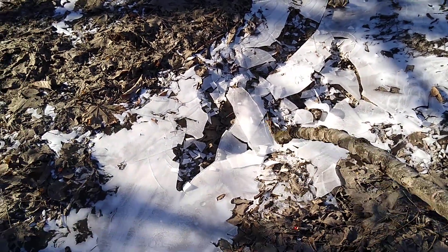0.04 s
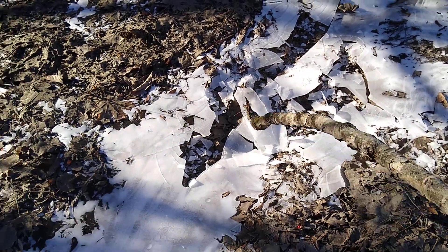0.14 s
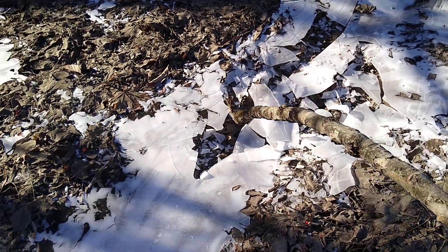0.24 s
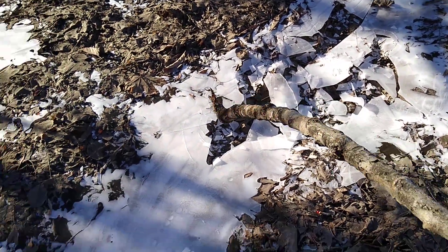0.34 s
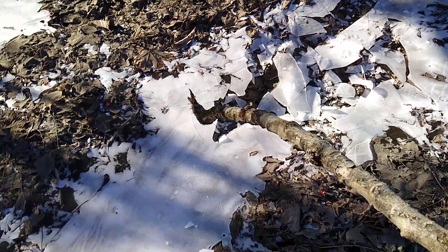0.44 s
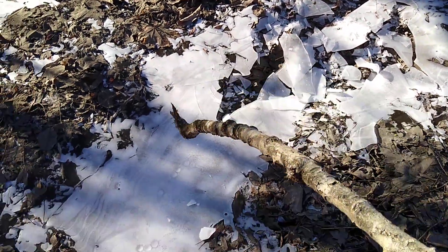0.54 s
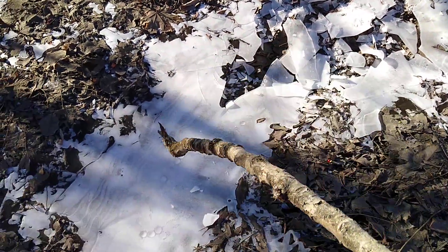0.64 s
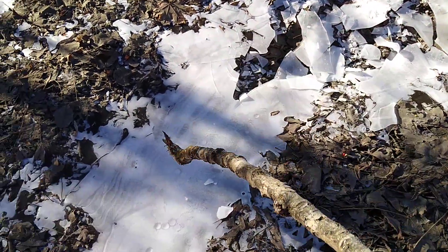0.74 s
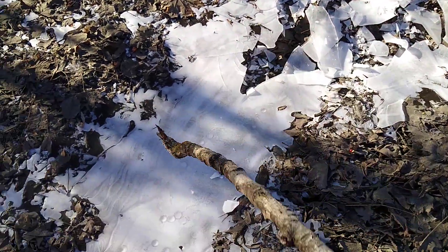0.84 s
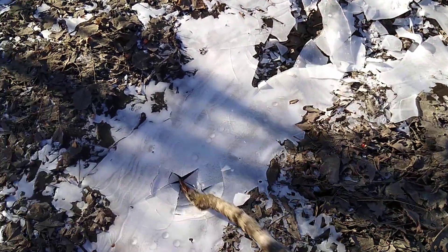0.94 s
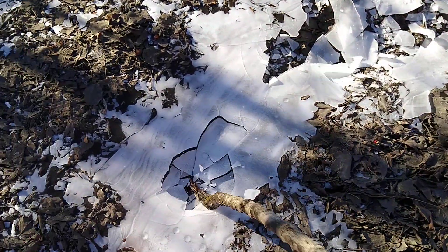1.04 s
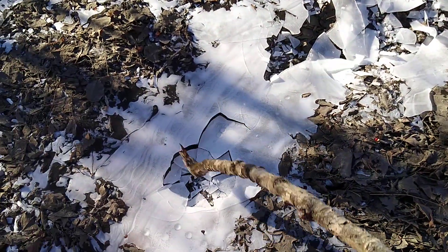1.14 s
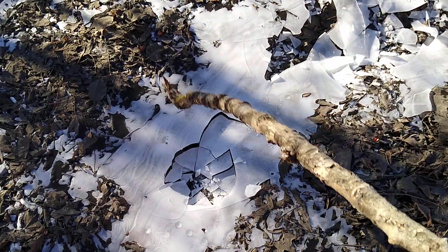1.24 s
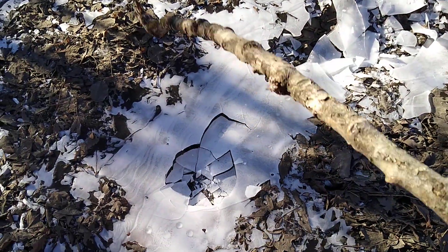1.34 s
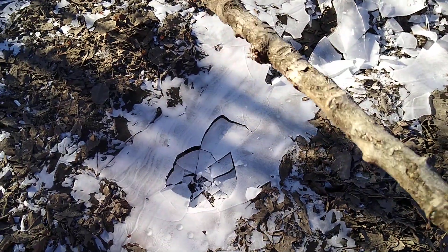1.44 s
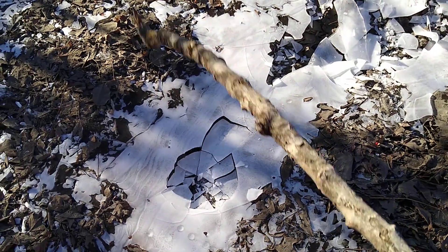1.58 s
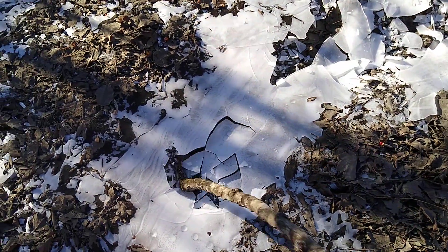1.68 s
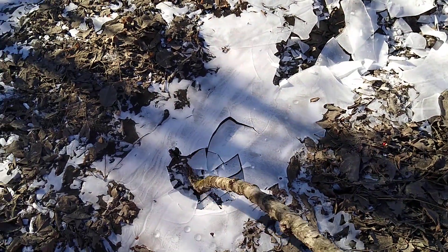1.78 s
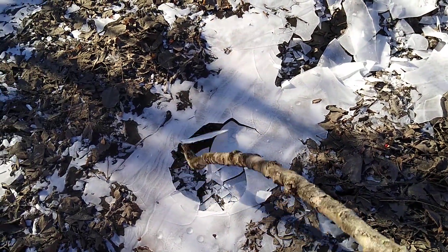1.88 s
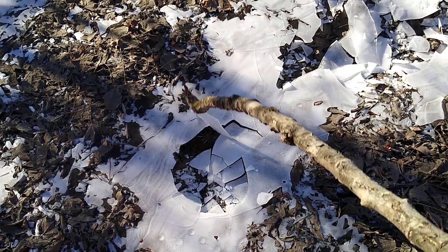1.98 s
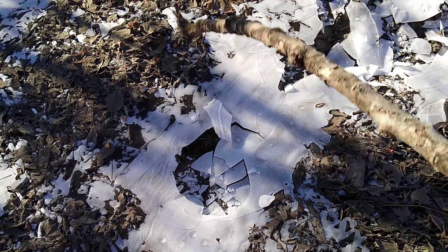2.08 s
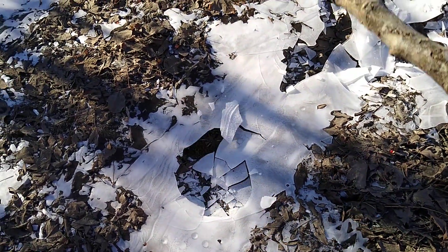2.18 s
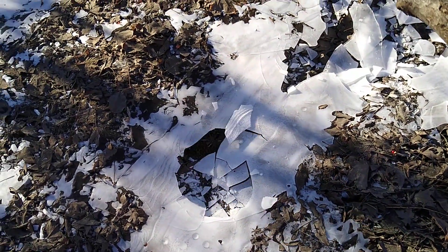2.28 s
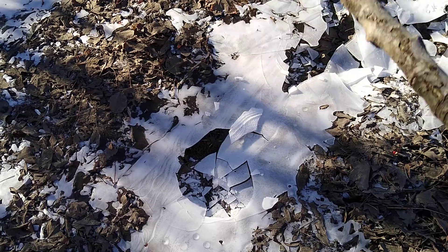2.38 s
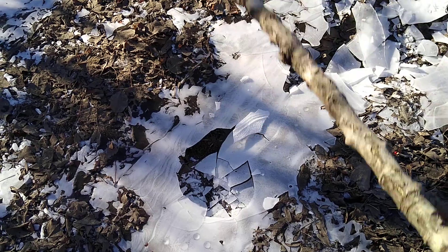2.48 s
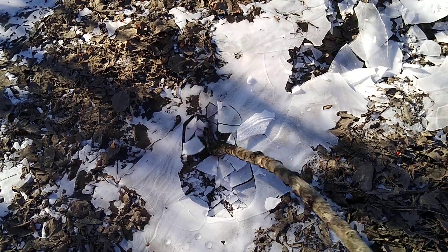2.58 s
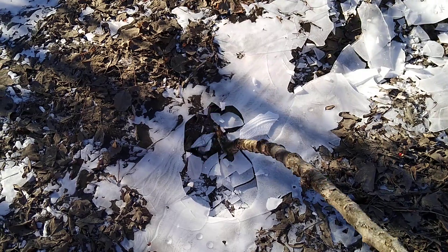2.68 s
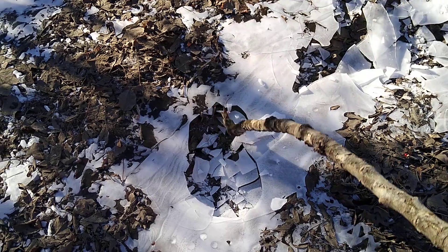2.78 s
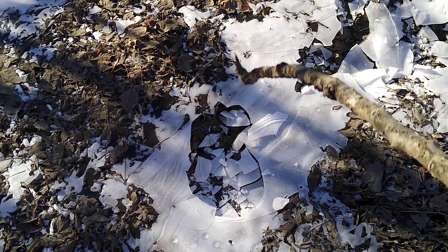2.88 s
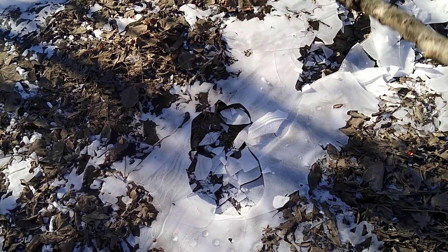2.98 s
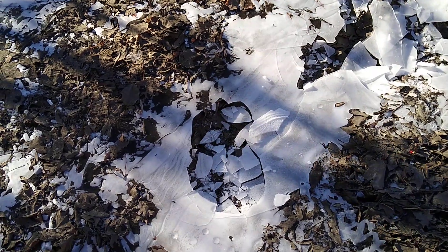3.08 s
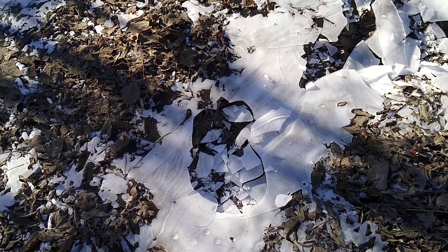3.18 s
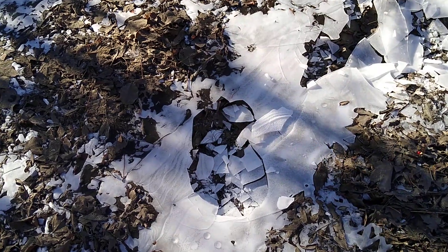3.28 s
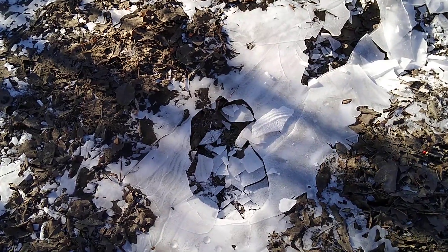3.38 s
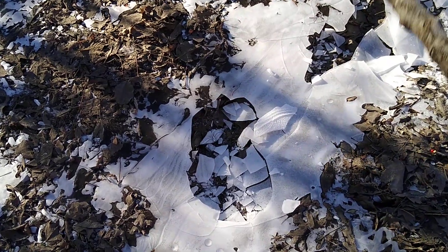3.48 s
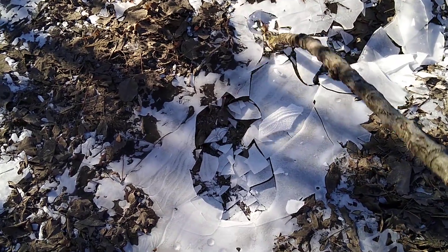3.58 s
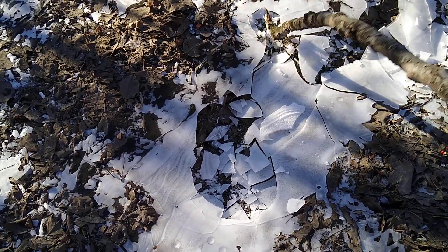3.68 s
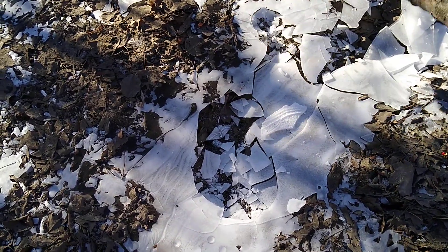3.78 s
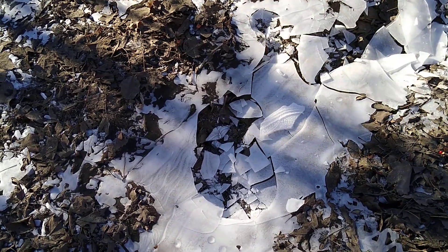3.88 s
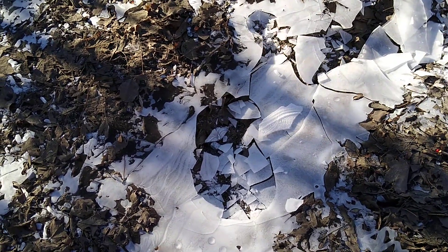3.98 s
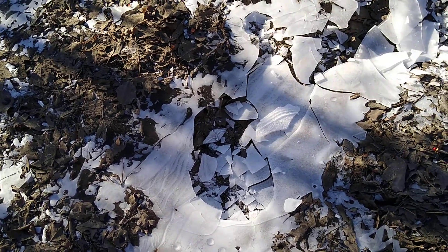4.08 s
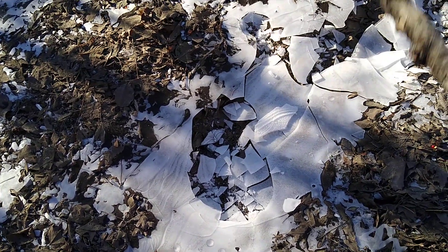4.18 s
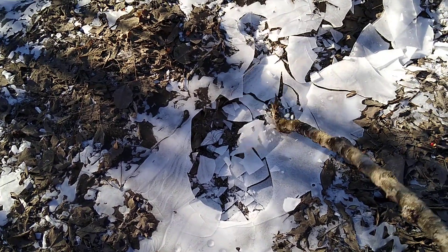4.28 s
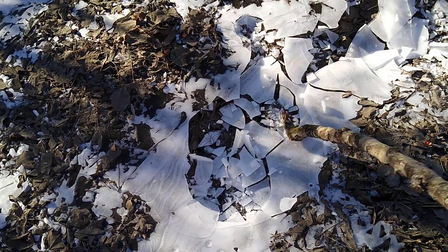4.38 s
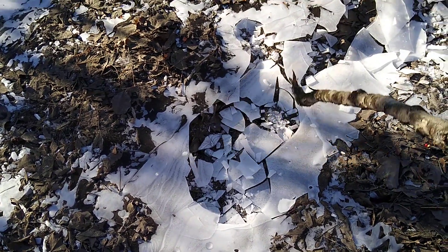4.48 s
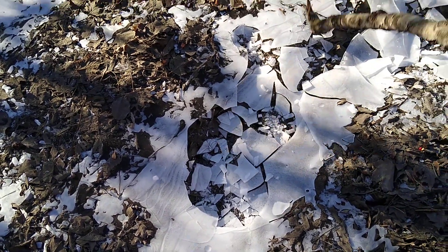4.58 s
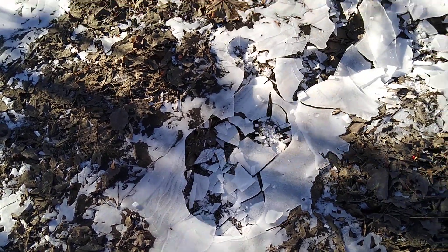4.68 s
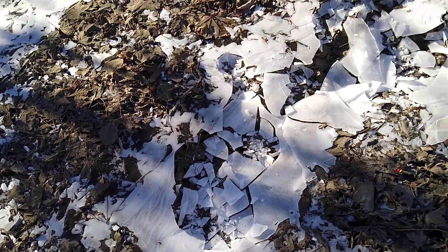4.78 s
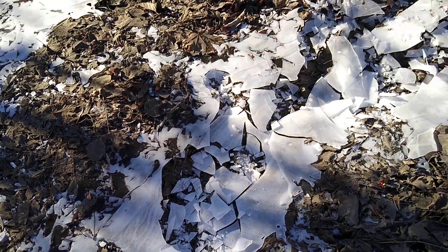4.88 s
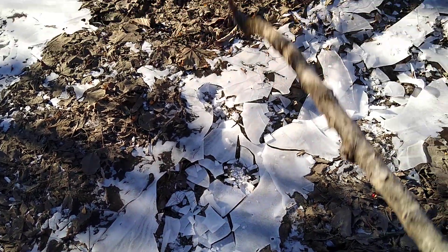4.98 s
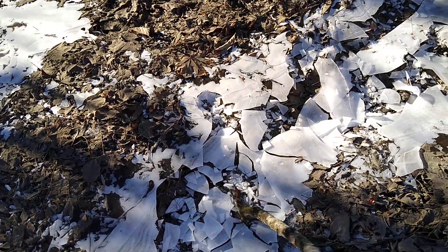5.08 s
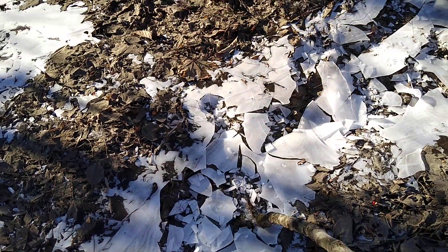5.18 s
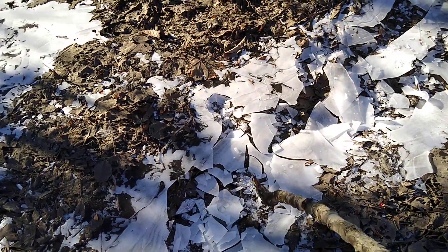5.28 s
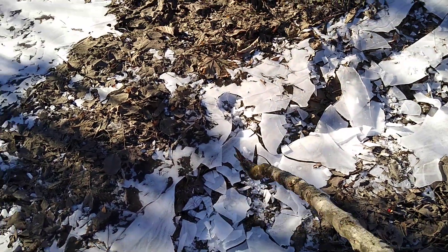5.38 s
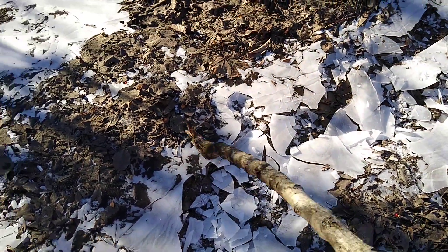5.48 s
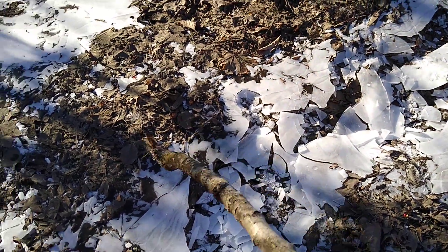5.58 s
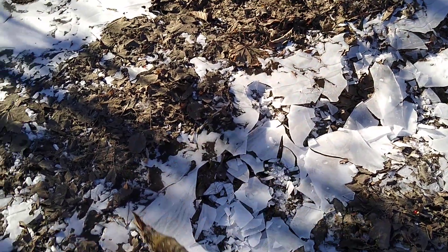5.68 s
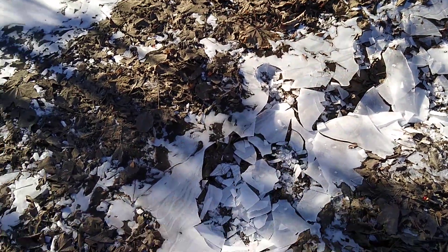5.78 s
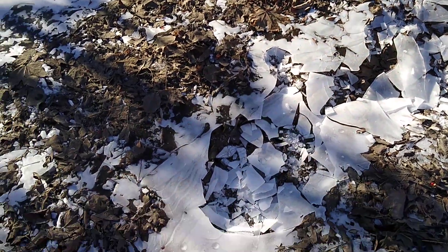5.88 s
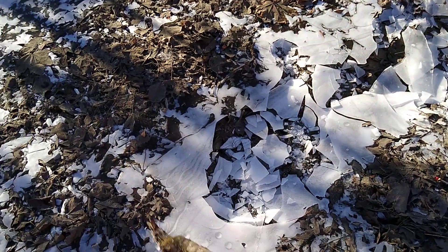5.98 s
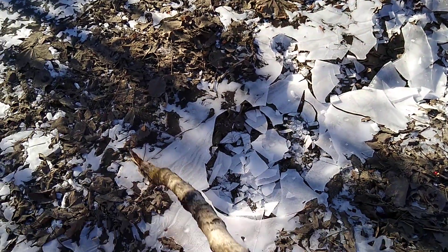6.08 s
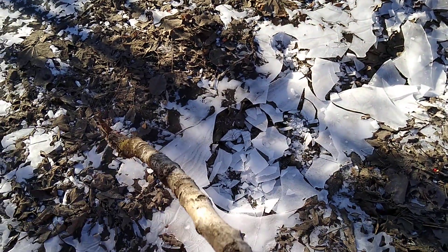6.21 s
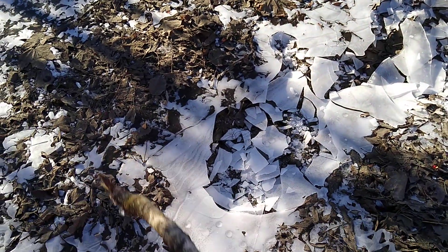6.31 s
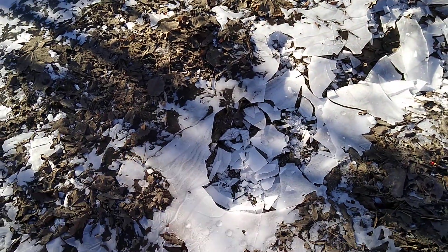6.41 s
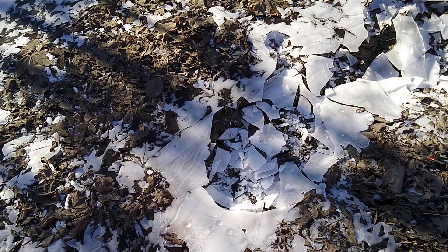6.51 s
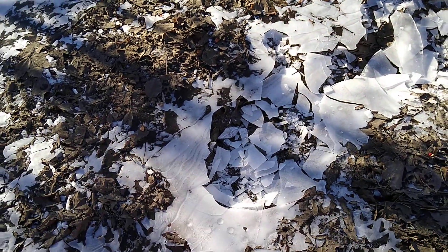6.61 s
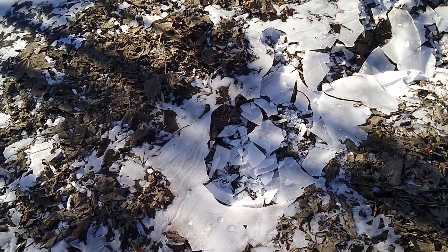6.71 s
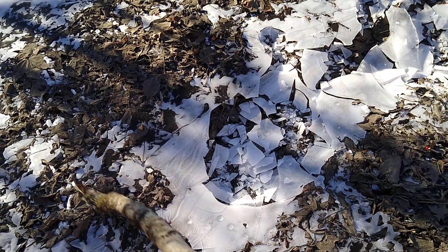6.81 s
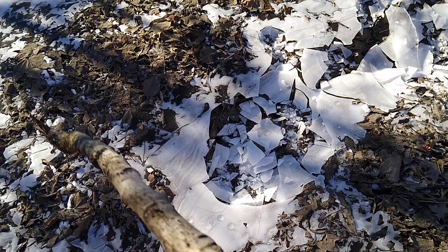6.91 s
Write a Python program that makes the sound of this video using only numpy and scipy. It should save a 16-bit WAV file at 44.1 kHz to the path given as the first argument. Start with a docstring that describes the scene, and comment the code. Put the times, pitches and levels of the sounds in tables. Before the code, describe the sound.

A stick breaks thin, hollow ice lying over dry leaves, heard close and slightly left in open woods. Faint ticking taps come at 0 to 0.3 seconds, then a light crack with small crackles near 0.6 to 0.7. Hard jabs snap through at about 1.06 and 1.8, each sharp and glassy with a hollow low puff, followed by clattering, clinking fragments. Small cracks follow near 2.0; at 2.2 a loose plate is knocked free, rings brightly and skates with a thin scrape. Further crunching blows land at 2.7, 3.65, 4.4, 5.2, 5.87 and 6.55, with a sharp tap at 4.75; splinters tinkle and settle between them. A weak dull echo trails the ice. Beneath, a soft low rumble gradually sinks, with faint hiss and a narrow airy rushing tone coming and going until about 7 seconds.

```python
"""A stick taps thin shell ice that lies hollow over dry leaves, outdoors, over a low rumble and faint hiss.
It cracks the sheet lightly, then jabs through it again and again in quick fractures with low puffs of air.
After each blow, noise grains and damped modes make the pieces clatter, clink and settle into the leaves.
At 2.2 s a loose plate is knocked free: clicks set its modes ringing, then coloured grains make it skate.
The jabs go on to the end; a weak echo tail follows the ice, and a narrow rushing tone swells and fades."""
import sys
import numpy as np
from scipy import signal
from scipy.fft import rfft, irfft
from scipy.io import wavfile
from scipy.ndimage import uniform_filter1d

SR = 44100
rng = np.random.default_rng(int(sys.argv[2]) if len(sys.argv) > 2 else 0)


def dump(signal):
    """Clip the signal to [-1, 1] and save it as 16-bit WAV at the path in sys.argv[1]."""
    limited = np.clip(np.atleast_2d(signal).T, -1, 1)
    pcm = np.round(limited * 32767).astype(np.int16)
    wavfile.write(sys.argv[1], SR, pcm)


N = 306450


def from_db(db):
    """Decibels to amplitude."""
    return 10 ** (np.asarray(db) / 20)


def rms_one(x):
    """Scale to an RMS of one."""
    return x / np.sqrt(np.mean(x ** 2) + 1e-20)


def in_time(rows):
    """Each column of a curve, sample by sample."""
    s, *columns = np.transpose(rows)
    return [np.interp(np.arange(N) / SR, s, column) for column in columns]


def add(out, s, sound):
    """Mix a sound in at its time."""
    at = int(s * SR)
    out[..., at:at + sound.shape[-1]] += sound[..., :N - at]


def band(x, low_hz, high_hz, order=3):
    """Causal band-pass."""
    sos = signal.butter(order, [low_hz, min(high_hz, .45 * SR)], "band", fs=SR, output="sos")
    return signal.sosfilt(sos, x + 1e-18)


def colour(x, points, share=1):
    """Minimum-phase filter through (Hz, dB) points scaled by share, so nothing sounds early."""
    hz, db = np.transpose(points)
    grid = np.maximum(np.fft.rfftfreq(4096, 1 / SR), 1)
    gain_db = share * np.interp(np.log(grid), np.log(hz), db)
    # folding the cepstrum gives the minimum phase
    cepstrum = irfft(np.log(from_db(gain_db)))
    half = len(cepstrum) // 2
    cepstrum[1:half] *= 2
    cepstrum[half + 1:] = 0
    pulse = irfft(np.exp(rfft(cepstrum)))
    pulse = pulse.reshape((1,) * (x.ndim - 1) + (-1,))
    return signal.oaconvolve(x, pulse)[..., :x.shape[-1]]


def ring(clicks, hz, t60):
    """A two-pole resonator: each unit click starts a damped sine of height 1."""
    radius = from_db(-60 / (max(t60, 1e-4) * SR))
    w = 2 * np.pi * hz / SR
    return signal.lfilter([0, np.sin(w)], [1, -2 * radius * np.cos(w), radius ** 2], clicks + 1e-18)


def damped_tones(rows):
    """Single sines that die away exponentially."""
    out, t = np.zeros(N), np.arange(SR // 3) / SR
    for s, hz, db, t60 in rows:
        add(out, s, from_db(db - 60 * t / t60) * np.sin(2 * np.pi * hz * t))
    return out


def grains(size, per_s, spread_db):
    """Random clicks of either sign, their sizes spread exponentially in dB."""
    out = np.zeros(size)
    at = np.flatnonzero(rng.random(size) < per_s / SR)
    sizes = from_db(spread_db * np.minimum(rng.exponential(1, len(at)), 4))
    out[at] = sizes * rng.choice([-1, 1], len(at))
    return out


def widen(pair, wide_hz=3500):
    """Mid and side to left and right: the bass is shared, the treble differs."""
    side = signal.lfilter(*signal.butter(1, wide_hz, "high", fs=SR), pair[1])
    return np.array([pair[0] + side, pair[0] - side])


# The sheet breaks under the stick. Each row: start in seconds, time the fracture runs in seconds,
# relative level in dB, tilt in dB per octave, hollow knock in dB.
BREAKS = [(0.5973, 0.007, -43.5, -3.5, -9.5), (0.6838, 0.008, -30.5, -0.5, -1.5),
          (0.7032, 0.015, -44, -1.5, -6.5), (1.0615, 0.036, -23, -2.1, 2.5), (1.0745, 0.016, -28, 2.5, -10),
          (1.1392, 0.12, -37.5, 1.2, -2), (1.789, 0.016, -22.5, -0.44, 4.5),
          (1.798, 0.011, -25, -0.7, -7.5), (1.9536, 0.023, -47.5, 2, -2.5), (1.971, 0.06, -42.5, -3, 6.5),
          (2.0103, 0.049, -42.5, 1.9, -4.5), (2.109, 0.031, -52.5, -3.7, 8),
          (2.1948, 0.024, -42.5, 2.5, 2.5), (2.203, 0.012, -34.5, 7, 2.5), (2.2049, 0.0096, -29.5, 1, 5),
          (2.294, .012, -48, -3.5, -0.5), (2.311, .015, -36, 1.3, 1.5), (2.6866, .019, -25, 1.5, 6.5),
          (2.698, 0.009, -21, -.2, -12), (2.736, .018, -42, 1, -16), (3.65, 0.0063, -25, -1.3, 4.5),
          (3.655, 0.0095, -24.5, 1.7, 0), (3.6743, .016, -39, 2.5, -2.5), (3.726, 0.024, -39, 4.5, -7),
          (4.3757, 0.00099, -26.5, 1.9, -0.5), (4.3767, 0.033, -24.5, -0.5, -8),
          (4.521, 0.021, -37, 0.1, 8), (4.5827, .0085, -49, 6, 15.5), (4.6152, 0.02, -48, 3.8, 6.5),
          (5.192, .0084, -24.5, 1.3, -5.5), (5.1937, 0.029, -28.5, -1.5, -10),
          (5.3727, 0.025, -52.5, 3.5, 10.5), (5.865, 0.016, -24.5, -0.1, 2), (5.868, 0.016, -24, 0.2, 2.5),
          (5.8713, 0.024, -34, -3.5, 5.5), (5.9604, 0.029, -32.5, -2, 2), (6.5426, 0.024, -25.5, -0.2, 2.5),
          (6.553, 0.015, -26.5, 1, -2)]
# The stick taps ice that holds. Each row: start in seconds, relative level in dB, tilt in dB per octave.
TAPS = [(0.045, -40, 1.5), (0.092, -43, 4), (0.113, -38.5, 3.5), (0.2803, -37.5, 0.5), (0.3, -38, -.5),
        (0.7109, -39, 1.5), (0.7531, -45, 1.5), (0.8233, -56.5, 0), (1.043, -54.5, -2), (2.166, -54.5, 0),
        (3.0092, -57.5, -0.5), (3.0657, -50.5, -0.5), (4.6765, -46.5, 1.5), (4.7317, -44, 1),
        (4.754, -25, -2)]
# Chips snap off the broken edge. Each row: start in seconds, relative level in dB, tilt in dB per octave.
CHIPS = [(1.2347, -44, -1.5), (1.2628, -55, 0), (1.282, -49.5, 2), (1.3066, -55, 4), (1.34, -43, 1),
         (1.644, -60.5, -2), (1.6947, -54.5, 2.5), (1.8881, -47.5, 2), (2.5221, -53.5, 2),
         (2.8115, -50.5, 4.5), (2.828, -49, 1), (2.842, -50.5, 4.5), (2.903, -47, 3.5), (2.9612, -40, -0.5),
         (3.0324, -51, -5.5), (3.1352, -51, -3), (3.1793, -59.5, 1.5), (3.343, -59, -2.5),
         (3.5007, -61, -0.5), (3.5459, -59, -2.5), (3.7955, -45, 3.5), (3.8381, -51.5, 6.5),
         (3.8833, -55.5, 2.5), (3.906, -56, 4), (4.6554, -51, -0.5), (4.8709, -53, -3),
         (4.9276, -63.5, -4.5), (5.315, -42.5, -1), (5.3446, -52, 3), (5.4632, -52.5, -2.5),
         (5.7943, -76, 4), (6.02, -58.5, 3.5), (6.065, -55, 6), (6.1945, -71, 1), (6.645, -49, 0.5),
         (6.7036, -61.5, 7.5), (6.7449, -60, 6.5), (6.787, -61, 4.5), (6.8347, -58.5, 0.5), (6.872, -63, 1)]
TAP_RUN_S, CHIP_RUN_S = 0.0034, 0.019   # time the fracture runs
# Colour of each kind of snap. Each entry: relative level in dB of one crack band, lowest first.
BREAK_BANDS_DB = [-8.5, -2.5, -0.5, 0.8, -3.5]
TAP_BANDS_DB = [-12.5, 0.5, -2, -11.5, -10]
CHIP_BANDS_DB = [-16, -17.5, -7, -0.5, 0.35]
# The hollow answers in the low middle. Each entry: share of the knock's dB in one crack band.
KNOCK_SHARES = [0, 1, 1, 0, 0]


def cracks():
    """The sheet breaks over its hollow, the stick taps, chips come off: all are short fractures."""
    s, run_s, db, tilt, knock_db = np.transpose(BREAKS)
    bands_db = tilted(BREAK_BANDS_DB, db, tilt) + np.outer(knock_db, KNOCK_SHARES)
    out = place_fractures(s, run_s, bands_db)
    for rows, run_s, kind_db in ((TAPS, TAP_RUN_S, TAP_BANDS_DB), (CHIPS, CHIP_RUN_S, CHIP_BANDS_DB)):
        s, db, tilt = np.transpose(rows)
        out = out + place_fractures(s, run_s, tilted(kind_db, db, tilt))
    return widen(out)


# Edges of the crack bands. Each entry: frequency in Hz.
CRACK_EDGES_HZ = [100, 350, 900, 2000, 5000, 16000]
TILT_PIVOT_HZ = 2000


def tilted(bands_db, db, tilt):
    """Band levels of each snap, leaning to bass or treble about the pivot."""
    octaves = np.log2(np.array(CRACK_EDGES_HZ) / TILT_PIVOT_HZ)
    centres = (octaves[1:] + octaves[:-1]) / 2
    return np.array(bands_db) + db[:, None] + np.outer(tilt, centres)


# Colour of breaking ice before its bands are levelled. Each row: frequency in Hz, relative level in dB.
ICE = [(59, -26.5), (100, -4), (206, 6.5), (358, -1.5), (513, 0), (736, -5), (1080, 3), (1910, -6),
       (2320, -4), (4020, -7), (6150, -21), (7940, -22.5), (10900, -13), (15000, -17), (16000, -25.5)]


def place_fractures(s, run_s, bands_db, lead_s=0.0013, lead_db=-19.5):
    """One fracture per time, split into bands that each get their own energy."""
    out, sounds = np.zeros((2, N)), 0
    raw = colour(np.array([fracture(run) for run in run_s + np.zeros(len(s))]), ICE)
    for k, (low, high) in enumerate(zip(CRACK_EDGES_HZ, CRACK_EDGES_HZ[1:])):
        part = band(raw, low, high)
        # 0 dB is an RMS of one if the energy is spread over 10 ms
        part *= np.sqrt(SR / 100) / np.linalg.norm(part, axis=-1, keepdims=True)
        sounds = sounds + part * from_db(bands_db[:, k])[:, None, None]
    for start, sound in zip(s, sounds):
        add(out, start - lead_s, from_db(lead_db) * sound)   # a faint copy of each snap comes just before it
        add(out, start, sound)
    return out


def fracture(run_s, first=3.2, sheet_db=-17.0, sheet_t60=0.13, shard_db=-11.0, shard_t60=0.025, count=7):
    """A first snap, a run of smaller ones as the crack travels, then the ring of shard and sheet."""
    t = np.arange(SR // 9) / SR
    snaps = grains(len(t), 3500, 2.2) * from_db(-26 * t / max(run_s, 1e-4))
    snaps[0] = first * rng.choice([-1, 1])
    snaps /= np.linalg.norm(snaps)
    pair = np.array([snaps, snaps * rng.choice([-1, 1], len(t))])
    tail = rng.standard_normal(pair.shape) * from_db(-60 * t / sheet_t60)
    # every shard has a few modes of its own
    pitches = rng.uniform(1200, 14000, (count, 1))
    modes = np.sin(2 * np.pi * pitches * t) * from_db(-60 * t / shard_t60)
    shard = rng.standard_normal((2, count)) @ modes
    shard *= from_db(shard_db) / np.linalg.norm(shard[0])
    # a longer fracture shakes more of the sheet
    tail *= from_db(sheet_db) * np.sqrt(run_s / 0.021) / np.linalg.norm(tail[0])
    return pair + shard + tail


# Air pumped from the hollow as the sheet sags. Each row: start in seconds, pitch in Hz,
# starting level in dB before the band-pass, time to fall 60 dB in seconds.
THUMPS = [(1.066, 140, -22.5, 0.096), (1.791, 202, -32.5, .05), (2.699, 160, -21, 0.07),
          (2.72, 134.5, -31, 0.12), (3.655, 128.2, -32.5, 0.12), (4.38, 52.4, -21, 0.1),
          (4.383, 94.8, -33, 0.1), (5.194, 211, -26.5, 0.11), (5.21, 93, -32, 0.11), (5.279, 190, -37, .06),
          (5.867, 192, -29, 0.063), (5.965, 156, -28, 0.091), (6.547, 340.4, -22.5, 0.057)]


def puffs(lowest_hz=36, gust_hz=80):
    """Air pumped from under the sheet: damped low tones, the deepest part stronger on the left."""
    air = band(damped_tones(THUMPS), lowest_hz, 2000)
    gust = signal.sosfiltfilt(signal.butter(2, gust_hz, fs=SR, output="sos"), air)
    return np.array([air + 0.52 * gust, air - 0.68 * gust])


def debris():
    """Plates clatter, splinters tinkle, crumbs and dry leaves crackle: three sizes of grain."""
    clatter = settling(burst_db=-2.0, tail_db=-4.5, pace=1.0, bright_share=-.8)
    tinkle = settling(burst_db=-3.0, tail_db=-3.5, pace=0.99, bright_share=.4)
    crackle = settling(burst_db=-9.5, tail_db=-4.0, pace=1.05, bright_share=.7)
    return widen(
        pieces(clatter, 260, 1200, per_s=1100, spread_db=5.0, cycles=24, ring_db=-13.0, count=12)
        + pieces(tinkle, 1200, 5000, per_s=900, spread_db=5.0, cycles=140, ring_db=-4.0, count=18)
        + pieces(crackle, 5000, 15800, per_s=2000, spread_db=-0.5, cycles=35, ring_db=-3, count=16))


# Debris is stirred up, then settles; each size of piece shifts these values.
# Each row: start in seconds, rise in seconds, first burst in dB, settling level in dB,
# fall of the settling in dB per second, brightness in dB.
SPILLS = [(0.0, 0.0032, -48, -47, 80, -3), (0.27, .07, -77, -54, 188, 0), (0.579, .024, -56, -54, 82.5, -1),
          (0.53, .15, -42, -45, 150, -1), (1.06, .025, -35, -41, 70, 0), (1.787, .025, -38, -47, 93, 0),
          (1.92, .04, -59, -48, 69.5, 0), (2.2, 0.022, -33, -50, 70, -2.5), (2.685, .025, -37, -43, 42, 0),
          (3.648, .026, -43.5, -37, 135, 2), (4.374, 0.039, -46, -36, 66, 1.5),
          (5.19, .025, -41.5, -44, 71, 2), (5.863, 0.026, -43.5, -38.5, 129.5, -2),
          (6.54, 0.025, -42, -46, 79, 2.5)]
BURST_FALL_DB_PER_S = 329.5   # the first burst dies fast
RISE_DEPTH_DB = 44.5   # how far below its top a spill is at its start time
REST_DB = -84   # the ice bed is never quite still


def settling(burst_db, tail_db, pace, bright_share):
    """Level in dB of one size of debris: each spill rises, bursts briefly, then dies away slowly."""
    t = np.arange(0, N, 32) / SR
    power = from_db(REST_DB) ** 2
    for s, rise_s, burst, tail, fall, bright in SPILLS:
        age = np.maximum(t - s - rise_s, 0)
        rise = RISE_DEPTH_DB * np.clip((t - s) / rise_s - 1, -10, 0) + bright_share * bright
        power = power + from_db(rise + burst + burst_db - BURST_FALL_DB_PER_S * age) ** 2
        power = power + from_db(rise + tail + tail_db - pace * fall * age) ** 2
    return np.interp(np.arange(N) / SR, t, 10 * np.log10(power))


# Colour of the debris. Each row: frequency in Hz, relative level in dB.
DEBRIS = [(150, -35.5), (250, -6), (360, -8), (452, -6.5), (875, -4.5), (1160, -2), (1420, -6), (1550, -2),
          (3010, -1.5), (3710, 0), (4260, -4), (4650, -10), (7700, -17), (12300, -4.5), (16000, -12.5)]


def pieces(level_db, low_hz, high_hz, per_s, spread_db, cycles, ring_db, count, thinning=0.36, clump_db=4.0):
    """Fragments touch in random clumps, more rarely as they settle: a dry tick and the hit piece's ring."""
    busy = from_db(thinning * np.clip(level_db + 41.5, -26, 6))
    clumps = from_db(clump_db * rms_one(uniform_filter1d(rng.standard_normal(N), size=300)))
    clicks = clumps * grains(N, per_s * busy, spread_db) / np.sqrt(busy)
    dealt = rng.integers(0, count, N)   # which piece each click hits
    pitches = np.geomspace(low_hz, high_hz, count) * np.exp(rng.normal(0, 0.023, count))
    pushes = np.sign(clicks) * np.sqrt(np.abs(clicks))   # hard touches crush more than they ring
    tones = np.array([ring(pushes * (dealt == k), hz, cycles / hz) for k, hz in enumerate(pitches)])
    places = rng.choice([-1., 1.], count)   # side of each piece
    ticks = rms_one(np.array([clicks, clicks * places[dealt]]))
    ringing = rms_one(np.array([tones.sum(0), places @ tones]))
    # pieces in flight ring freely, those lying in the leaves are damped
    freedom = np.minimum(busy, 1.5) ** 0.29
    pair = ticks + from_db(ring_db) * freedom * ringing
    return from_db(level_db) * rms_one(band(colour(pair, DEBRIS), low_hz, high_hz))


# The clearest shards and plates ringing. Each row: start in seconds, pitch in Hz,
# starting level in dB, time to fall 60 dB in seconds.
CLINKS = [(1.14, 2290, -60, .05), (1.288, 1520, -53, 0.1), (1.3075, 4120, -33.5, 0.025),
          (1.339, 3470, -30.5, 0.083), (1.339, 1513, -43.5, 0.13), (2.204, 4177, -17, 0.036),
          (2.699, 2330, -26.5, 0.079), (2.736, 2730, -39.5, 0.076), (2.767, 1173, -27.5, .039),
          (2.811, 3800, -33.5, 0.06), (2.903, 12500, -32, 0.053), (2.903, 6040, -41, 0.074),
          (2.908, 4650, -32, 0.071), (3.104, 3833, -46, 0.054), (3.651, 688, -10, .022),
          (4.391, 1469, -25, .06), (4.426, 9798, -34.5, 0.067), (4.435, 3670, -37.5, .06),
          (4.438, 2500, -30, 0.093), (4.481, 2760, -34.5, 0.077), (4.481, 4650, -35, 0.14),
          (4.6554, 3770, -33, 0.029), (4.755, 3172, -43, .1), (5.194, 1855, -19.5, .04),
          (5.329, 2715, -41.5, 0.04), (5.868, 2150, -17.5, .04), (6.544, 2140, -17, .04),
          (6.673, 4770, -46, 0.055), (6.834, 4130, -54, 0.076), (6.872, 3514, -52.5, 0.063)]


def clinks():
    """Clear shards and plates each ring as one damped sine."""
    return damped_tones(CLINKS)


# Modes of the loose plate. Each row: pitch in Hz, relative level in dB, time to fall 60 dB in seconds.
PLATE = [(1125, -3, 0.24), (1650, -6.5, 0.14), (2621, -3.5, 0.24), (3400, -4, 0.13), (3900, -5.5, 0.098),
         (4177, -12, 0.12), (5120, -19.5, .1)]
# Blows on the plate. Each row: start in seconds, level of the click in dB.
PLATE_BLOWS = [(2.204, -27.5), (2.308, -45)]
# The plate skating. Each row: time in seconds, level of the scrape in dB.
SKATE = [(2.2, -95), (2.23, -42.5), (2.34, -49.5), (2.45, -53), (2.6, -54), (2.7, -68.5), (2.9, -83.5)]
# Colour of the plate rubbing on the sheet. Each row: frequency in Hz, relative level in dB.
SCRAPE = [(120, -36), (200, -9), (349, -2), (401, -9.5), (529, 1), (617, -6.5), (677, 0), (1030, -9),
          (1160, -3), (1560, -17), (2150, -16.5), (3590, -23.5), (3990, -9), (4730, -32), (8000, -32),
          (10400, -63.5), (17600, -120)]


def loose_plate(modes_db=-21.0):
    """The freed plate's modes ring from two blows, then it scrapes and sings faintly as it slides."""
    blows = np.zeros(N)
    rub = np.array([grains(N, 2700, 2.0), grains(N, 3000, 2.3)])
    for s, db in PLATE_BLOWS:
        add(blows, s, from_db([db]))
    struck = sum(from_db(db) * ring(blows, hz, t60) for hz, db, t60 in PLATE)
    rubbed = sum(from_db(db) * ring(rub[0], hz, t60) for hz, db, t60 in PLATE)
    slide = widen(rms_one(colour(rub, SCRAPE))) + from_db(modes_db) * rms_one(rubbed)
    return struck + from_db(in_time(SKATE)[0]) * slide


def woods(x, echo_db=-37.5, t60=1.0):
    """Trunks and ground scatter back a weak, dull tail: decaying noise convolved with the ice."""
    t = np.arange(int(.8 * SR)) / SR
    envelope = from_db(-60 * t / t60) * (1 - np.exp(-t / 0.022))
    tail = band(rng.standard_normal((2, len(t))), 300, 4500, order=1) * envelope
    return from_db(echo_db) * signal.oaconvolve(x, tail / np.linalg.norm(tail[0]), axes=-1)[:, :N]


# Colour of the rumble. Each row: frequency in Hz, relative level in dB.
RUMBLE = [(15, -52), (25, -24), (43, -6.5), (70, -4.5), (97, 1), (139, -2), (159, -9), (174, -18),
          (199, -14), (289, -19.5), (334, -36.5), (512, -35), (600, -30), (780, -59.5), (1320, -120)]
# Colour of the hiss. Each row: frequency in Hz, relative level in dB.
AIR = [(300, -2.5), (650, -6.5), (900, -11.5), (1550, -8.5), (2250, -12), (3800, -16.5), (4400, -18.5),
       (5000, -16), (8500, -27.5), (12000, -19.5), (16000, -23)]
# The rumble swells and sinks, its drone and breeze with it. Each row: time in seconds, rumble level in dB.
BREEZE = [(0, -50), (.9, -54), (1.4, -53), (2.0, -50), (2.6, -51.5), (3.2, -53), (3.8, -53.5), (4.3, -55.5),
          (5.0, -57), (5.6, -58), (6.2, -60.5), (6.95, -60)]
# The faint hiss comes and goes. Each row: time in seconds, level in dB.
HISS = [(0, -51.5), (.45, -66), (.58, -63), (.98, -69), (1.3, -61), (1.7, -64.5), (2.6, -62), (3.3, -63),
        (3.9, -65.5), (4.25, -74.5), (4.5, -59), (5.15, -67), (5.55, -70), (5.75, -77.5), (6.42, -79),
        (6.48, -65.5), (6.95, -71.5)]


def outdoors(hum_db=-5.5, hum_hz=149, buffet_db=-9.0):
    """Filtered noise: low rumble with a wavering drone, a breeze on the left, and a faint hiss."""
    rumble = rms_one(band(colour(rng.standard_normal(N), RUMBLE), 35, 900))
    buffet = rms_one(band(rng.standard_normal(N), 59, 87)) * np.array([[1], [0]])   # left only
    hum = rms_one(band(rng.standard_normal(N), hum_hz - 5, hum_hz + 5, order=2))
    air = rms_one(colour(rng.standard_normal((2, N)), AIR))
    low = rumble + from_db(buffet_db) * buffet + from_db(hum_db) * hum
    return from_db(in_time(BREEZE)[0]) * low + from_db(in_time(HISS)[0]) * air


# The narrow rushing tone swells and fades. Each row: time in seconds, relative level in dB.
RUSH = [(0, -69), (.45, -70), (.6, -73), (.95, -88.5), (1.3, -67), (1.65, -73), (2.5, -69.5), (3.45, -65),
        (3.6, -77.5), (3.95, -66.5), (4.25, -83.5), (4.8, -65), (5.15, -68.5), (5.4, -71.5), (5.7, -90.5),
        (6.4, -85), (6.5, -68), (6.95, -70)]


def narrow_rush(centre_hz=1900, width_hz=330, level_db=-4.0):
    """A soft rushing tone: noise through a narrow band, swelling and fading."""
    noise = rng.standard_normal((2, N))
    rush = rms_one(band(noise, centre_hz - width_hz / 2, centre_hz + width_hz / 2, order=2))
    return from_db(in_time(RUSH)[0] + level_db) * widen(rush)


# The ice lies to the left. Each row: frequency in Hz, lean in dB,
# of which a share of 0.45 is added on the left and taken off on the right.
LEAN = [(100, -0.5), (330, 2.5), (770, 2.5), (1200, 8), (1800, 8), (2800, 8), (4200, 2), (6400, -5.5),
        (9800, 1), (15000, -3.5)]


def scene():
    """The breaking ice, mostly a little to the left, in the open woods."""
    ice = cracks() + debris() + clinks() + puffs() + loose_plate()
    ice = np.array([colour(ice[0], LEAN, share=0.45), colour(ice[1], LEAN, share=-0.45)])
    return ice + woods(ice) + outdoors() + narrow_rush()


CUTOFF_HZ = 16100


def record(dry):
    """The highest peaks are rounded by a soft clip and the top is cut by a steep low-pass."""
    rounded = 1.1 * np.tanh(dry / 1.1)
    return signal.sosfilt(signal.ellip(10, .2, 80, CUTOFF_HZ, fs=SR, output="sos"), rounded)


dry = scene()
out = record(dry)
dump(out)
```